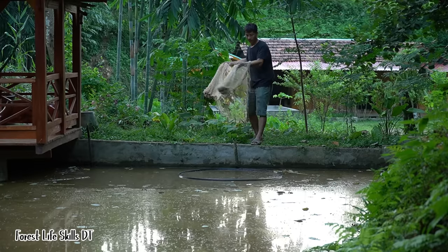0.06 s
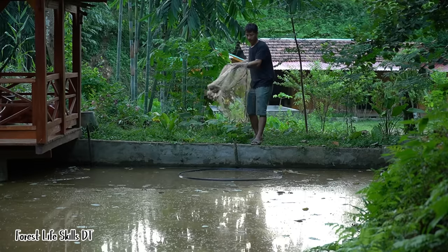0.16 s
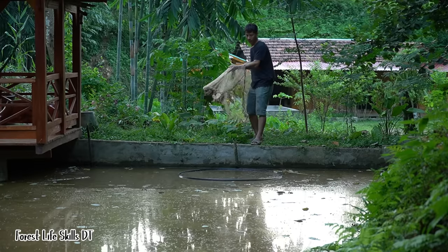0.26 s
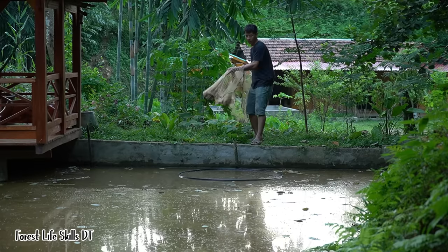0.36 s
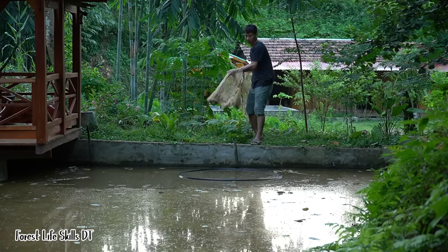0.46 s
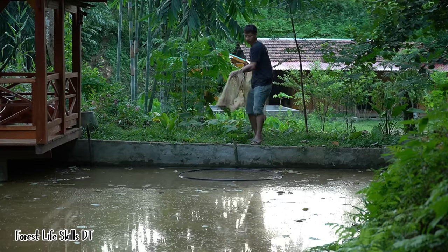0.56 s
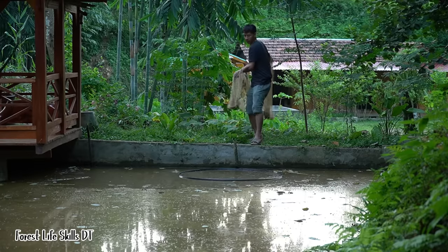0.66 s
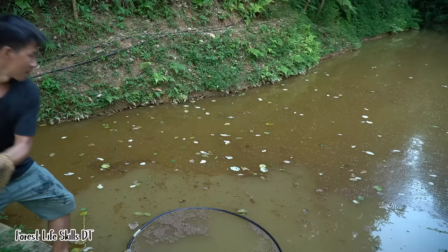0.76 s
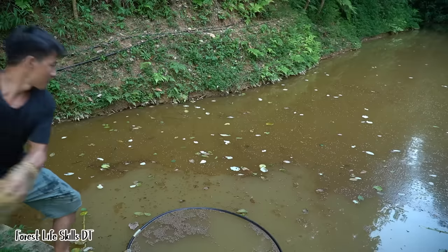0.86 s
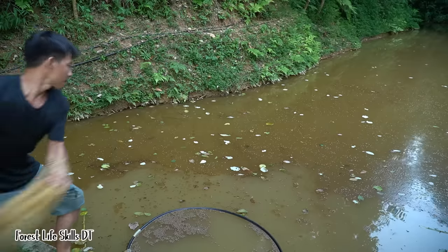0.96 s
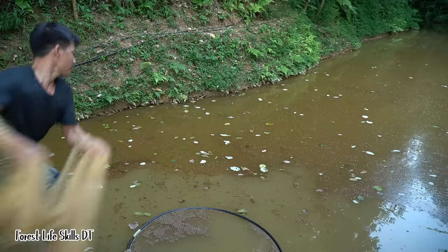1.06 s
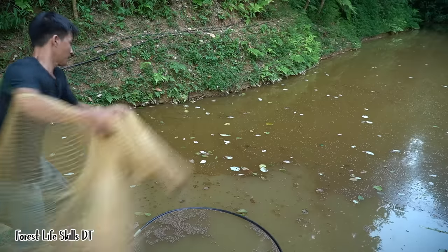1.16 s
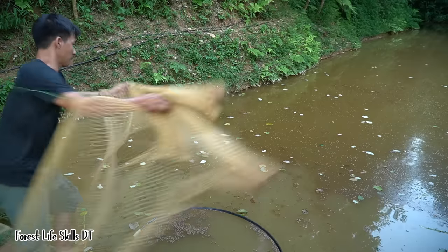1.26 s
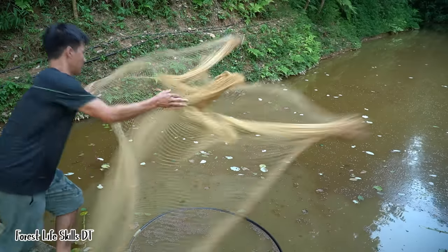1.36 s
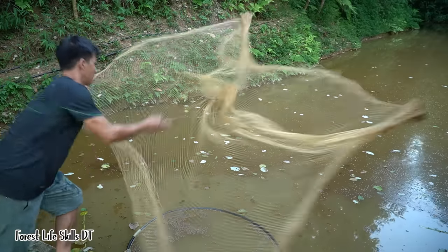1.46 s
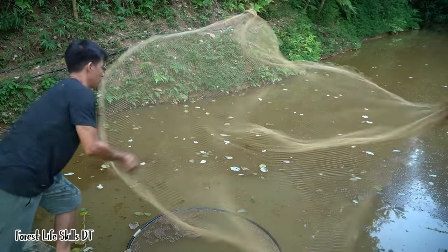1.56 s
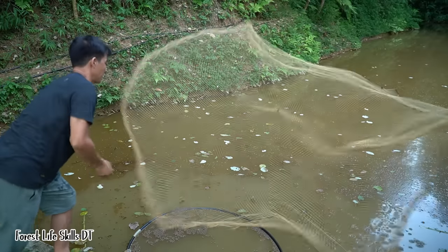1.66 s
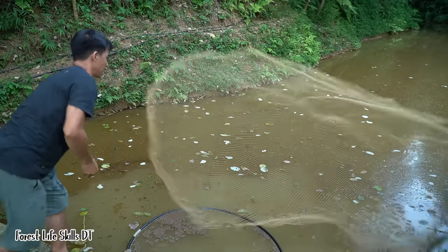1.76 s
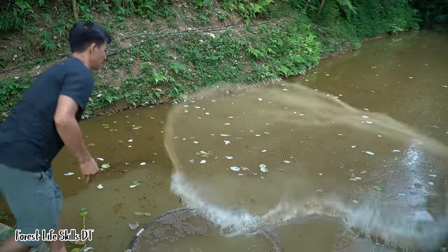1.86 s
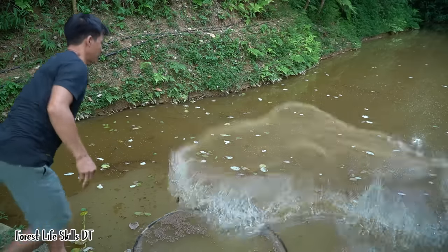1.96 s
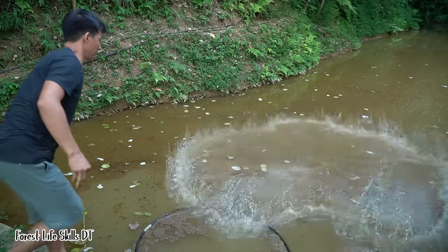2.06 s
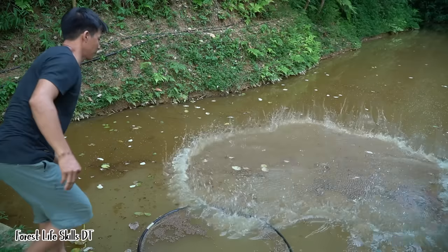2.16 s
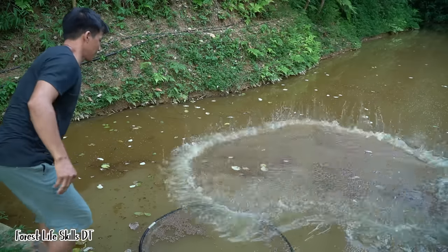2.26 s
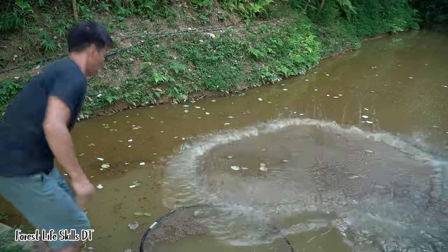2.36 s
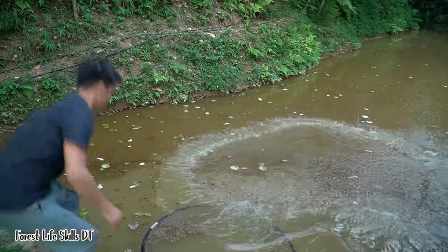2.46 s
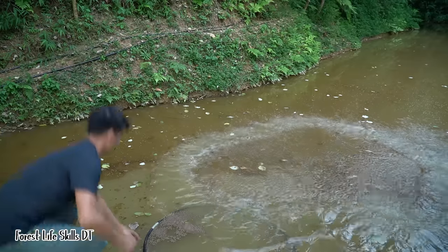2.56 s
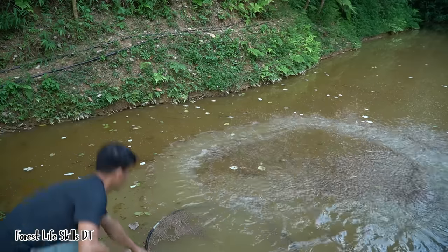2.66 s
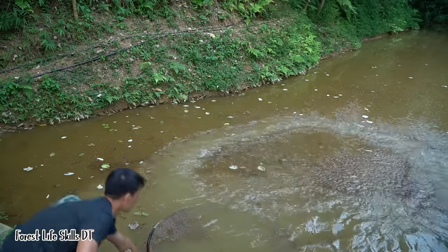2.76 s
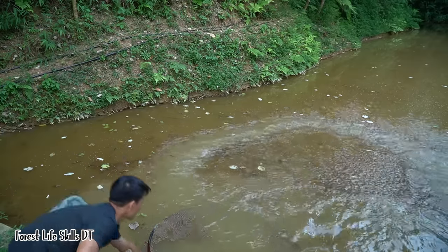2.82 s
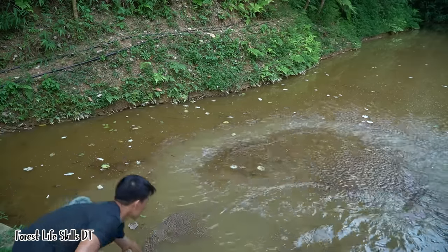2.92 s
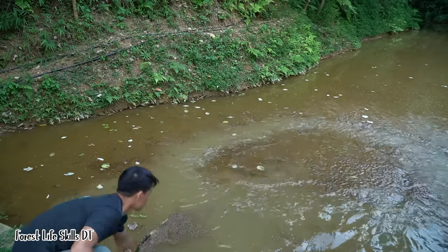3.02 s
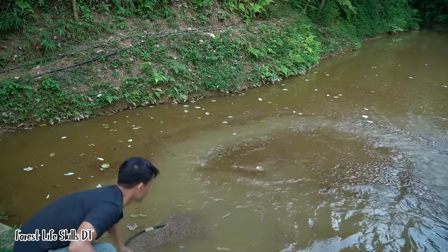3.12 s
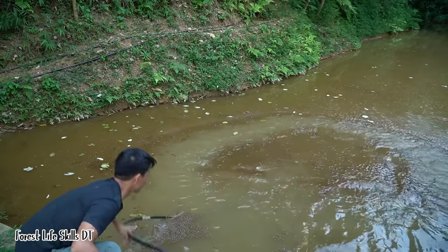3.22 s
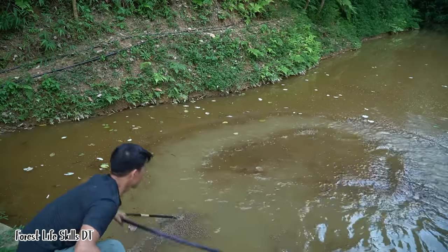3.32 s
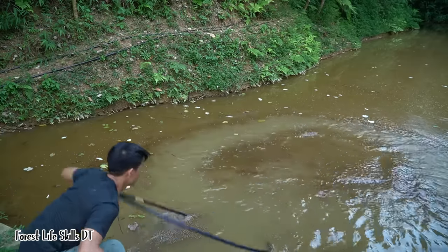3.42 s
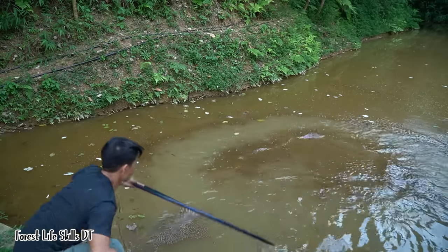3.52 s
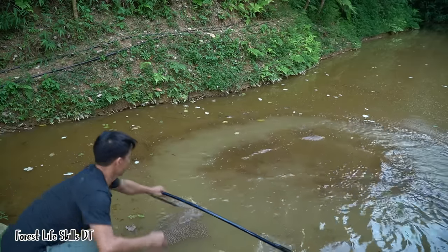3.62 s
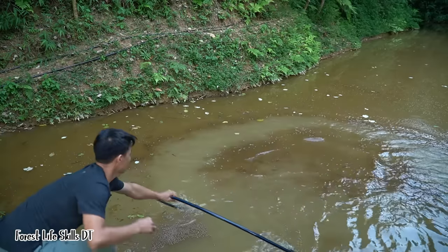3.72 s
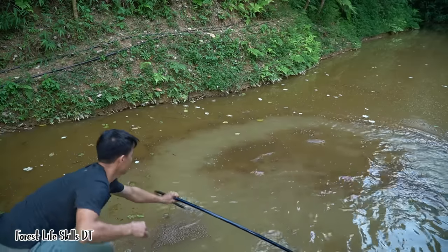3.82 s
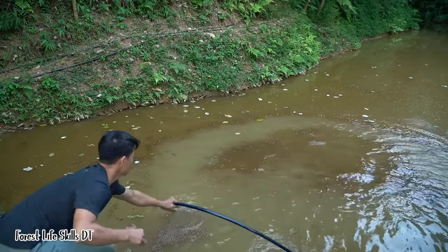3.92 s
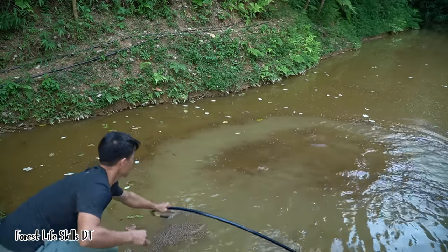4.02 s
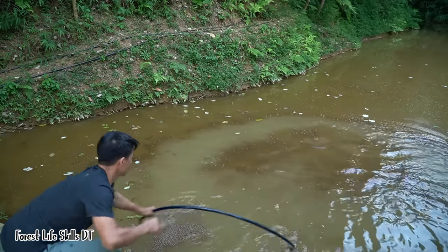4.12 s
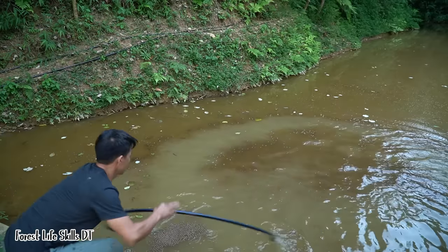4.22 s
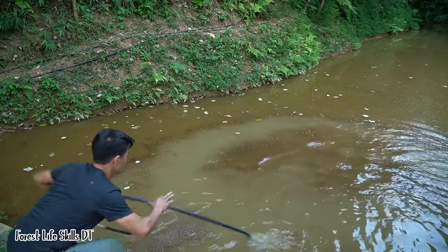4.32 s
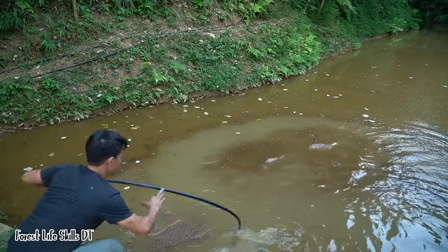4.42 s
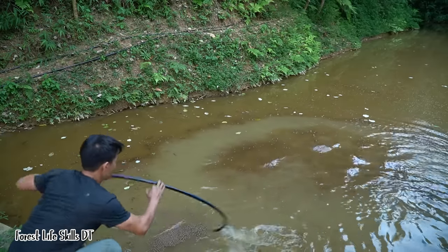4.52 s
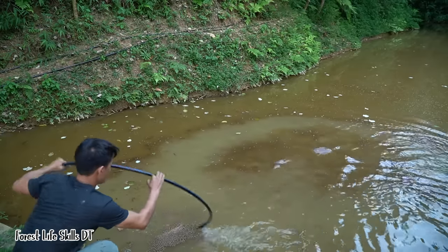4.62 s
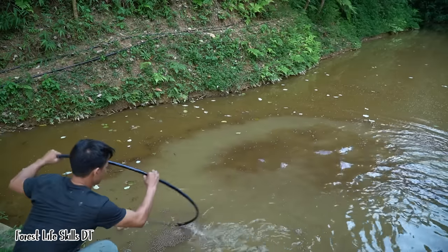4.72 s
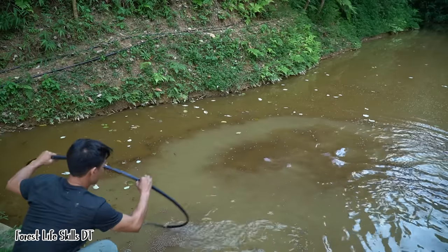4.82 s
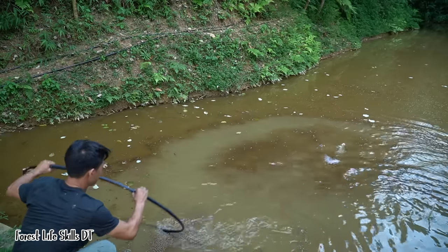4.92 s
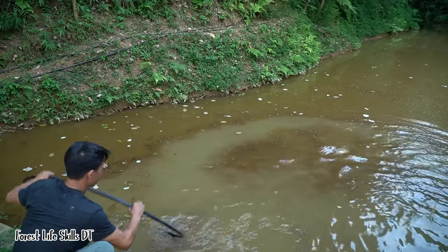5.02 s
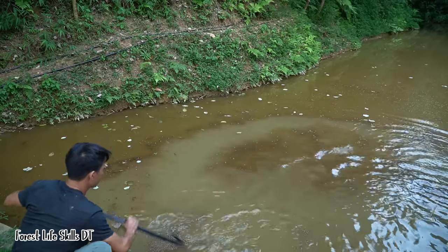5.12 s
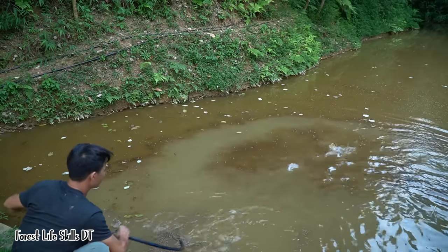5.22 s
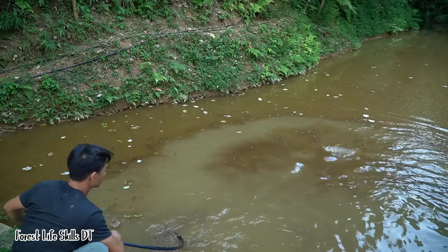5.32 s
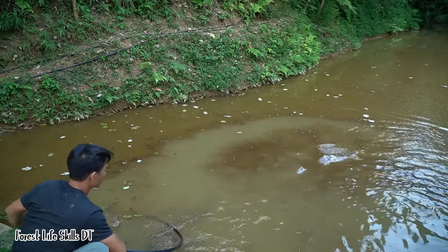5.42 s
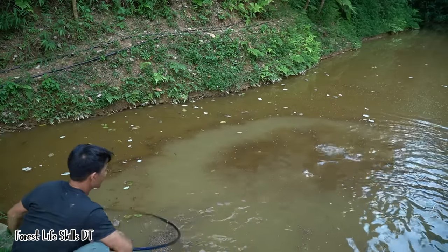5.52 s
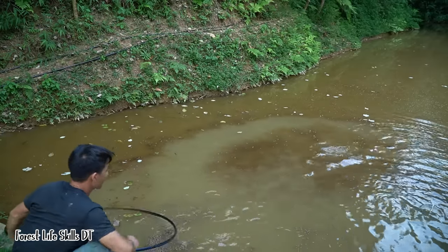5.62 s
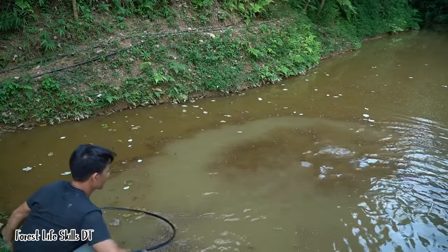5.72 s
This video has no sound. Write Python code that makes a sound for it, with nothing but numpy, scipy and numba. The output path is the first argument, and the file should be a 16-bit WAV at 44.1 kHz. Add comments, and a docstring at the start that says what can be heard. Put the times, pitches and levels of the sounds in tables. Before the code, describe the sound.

Steady high insect chirring in a quiet forest, with a faint plop. After an abrupt cut closer, a wet net swishes, a sole creaks briefly, and the net slaps down in a broad, pattering splash. It fades to drips, then a hose dragged through water makes bubbly gulps and small sloshes. Open air, stereo microphone near the thrower, slight scatter from the banks.

```python
"""Insects chirr over a quiet forest floor; a plop and a mud bubble sound from the pond, both as single sines.
At 0.79 s the scene cuts, with a 37 ms crossfade, from a view across the pond to one beside the thrower.
A wet cast net is swung, a sole creaks in stick-slip clicks, the net flies and slaps down over a low rumble.
A hose dragged through the water then sloshes. Water is clouds of ringing bubbles under a hiss of spray noise.
The banks scatter the pond's sounds, foliage the cricket's swept chirps; choirs and hush are shaped noise."""
import sys
import numpy as np
from scipy import signal
from scipy.fft import rfft, irfft
from scipy.io import wavfile
from numba import njit

SR = 44100
rng = np.random.default_rng(int(sys.argv[2]) if len(sys.argv) > 2 else 0)


def store_pcm(level_fs):
    """Save levels as 16-bit WAV."""
    pcm = np.round(np.clip(level_fs, -1, 1) * 32767).astype(np.int16)
    wavfile.write(sys.argv[1], SR, np.atleast_2d(pcm).T)


N = 254898

VIEW_CUT_S, CROSSFADE_S = .79, .037   # from across the pond to beside the thrower

# Forest hush. Each row: frequency in Hz, dB per Hz across the pond, dB per Hz at the thrower.
AIR = [(20, -77, -76), (50, -78.5, -83), (123, -81.5, -83), (228, -90, -88.5), (610, -91.5, -83.5),
       (1500, -94, -86), (3160, -97.5, -92), (5840, -101, -99), (8200, -101, -100), (10200, -105, -101),
       (12000, -109, -103), (16000, -112, -108)]
# How alike the hush is in both ears. Each row: frequency in Hz, left-right likeness (1 = the same).
AIR_LIKENESS = [(30, .995), (150, 0.97), (300, 0.62), (900, 0.47), (15000, 0.072)]
# Far insect choirs. Each row: pitch in Hz, width of each of two band-passes in Hz, level in dB across
# the pond, level in dB at the thrower, L-R in dB, throbs per second, throb depth in dB.
CHOIRS = [(3350, 460, -65.5, -61, 0, 11, -2.5), (4720, 510, -59.5, -59, 2, 4.6, 4.5),
          (6726, 105, -56, -63.5, 7, 83, 1.5), (7010, 510, -56, -59.5, -0.5, 45, -0.5),
          (8990, 370, -61, -62.5, 2, 48, 3)]
# Near cricket, bouts of even chirps. Each row: first start in seconds, bout end in seconds, chirp length
# in seconds, first and last level in dB before panning, pitch in Hz, pitch climb as a share, swell in dB.
CRICKET_BOUTS = [(-.066, .7, .14, -50, -52, 9250, .01, -3), (.792, 1.7, .085, -46, -50, 9030, .015, 1.5),
                 (3.9, 4.6, .1, -45, -43, 8750, .015, 7), (4.72, 5.8, .11, -33.5, -29.5, 8920, .022, 7)]
CHIRP_PERIOD_S, STROKES_PER_S, STROKE_S = .207, 76, .008
STROKE_SWEEP_HZ, STROKE_JITTER_DB = -650, 2.0
CRICKET_PAN_DB, CRICKET_LAG = 8, 2   # the cricket sits left: L-R dB, samples later on the right
LEAF_TAIL_S, LEAF_TAIL_DB = .3, -8   # foliage scatters each chirp into a haze

# Single bubbles and drips. Each row: start in seconds, level in dB before onset and panning, pitch in Hz.
PLOPS = [(0.589, -37.5, 2550), (2.958, -31.5, 724), (3.069, -31.5, 510), (3.3, -27, 970),
         (3.332, -23.5, 903), (3.376, -26, 990), (3.409, -26, 860), (3.43, -24.5, 850), (3.499, -30, 1005),
         (3.559, -33, 880), (3.613, -21.5, 570), (3.6635, -25, 810), (3.708, -16, 1290),
         (3.717, -13.5, 1577), (3.774, -24, 588), (3.775, -31, 354), (3.801, -15.5, 920),
         (3.819, -26.5, 935), (3.9062, -28, 3260), (3.981, -31.5, 2600), (4.056, -30, 2420),
         (4.077, -34.5, 1036), (4.208, -37.5, 284), (4.267, -36, 905), (4.283, -28, 890), (4.311, -20, 820),
         (4.331, -17, 634), (4.359, -20, 546), (4.389, -21, 800), (4.569, -23, 480), (4.57, -38, 266),
         (4.604, -24, 570), (4.632, -25, 777), (4.645, -25.5, 500), (4.729, -24.5, 622),
         (4.766, -24.5, 810), (4.853, -28, 2320), (5.1589, -20, 910), (5.12, -36, 404), (5.17, -22.5, 427),
         (5.245, -28.5, 960), (5.255, -37, 304), (5.303, -35.5, 392), (5.349, -33, 1100),
         (5.413, -32, 2760), (5.575, -38, 273), (5.664, -40, 271), (5.69, -35, 1300)]
# Small bubbles ring a few cycles longer.
PLOP_CYCLES, PLOP_CYCLES_AT_HZ, PLOP_CYCLES_POWER, PLOP_GLIDE = 33, 800, .15, .15
# A big bubble climbing out of the mud. Each row: start in seconds, level in dB before onset, pitch in Hz,
# cycles to -60 dB, glide (the pitch shifts by twice this share over the ring).
MUD_BUBBLE = [(0.624, -39, 306, 50.5, 2.2)]
# Rise time constants as a share of the ring
PLOP_ONSET, BUBBLE_ONSET, SLAP_ONSET = .025, .05, .016
PORT_LAG_S, LONE_LAG_SHARE = .000065, .15   # lag spread between the ports; lone drops fall nearly in front

# Bubble sizes, deepest first. Each row: pitch spread in octaves, cycles to -60 dB before breakup, glide,
# bubbles per second when quiet before breakup, size spread in dB, trim in dB.
HEAVE = (0.364, 26.3, 0.52, 74, 2.7, 2.1)
GULP = (0.4816, 40.8, 0.36, 200, 2, 1.58)
PATTER = (0.639, 24.6, 0.27, 1500, 1.16, 1.4)
SNAP = (0.6, 4, -1.6, 120, -23, -11)   # single droplets bursting out of the spray
HEAVE_HZ, PATTER_HZ, SNAP_HZ = 301, 2239, 10000
GULP_HZ, GULP_SINK_OCT_PER_DB = 754.4, .37   # the more the gulps lead the patter, the deeper they are
BUSIER_PER_DB, QUIET_DB = 1.33, -51   # louder water also makes more bubbles
# How the water breaks up: the flying mesh swishes drily, sloshes drip singly.
# Each row: time in seconds, crowding in dB, share of the ring length kept.
BREAKUP = [(.8, 11, .35), (1.75, 11, .35), (1.77, 1.5, .8), (2.6, 1.5, .8), (2.95, -8.5, .85),
           (5.78, -8.5, .85)]
LUMP_DB, LUMP_HZ = 1.7, 14   # water arrives in lumps: rms swell, fastest swell
WATER_LOW_HZ = 147

# The wet net wound up and flying. Each row: time in seconds, gulps, patter and spray in dB before lumps
# and trims, L-R in dB.
SWING = [(.8, -64, -64, -68, 6), (.92, -64.5, -67, -72, 8), (1.0, -54, -64.5, -74, 17),
         (1.055, -63, -59.5, -63, 12), (1.13, -47, -44.5, -59, 9), (1.17, -52.5, -53, -64, 15),
         (1.199, -53.5, -54.5, -57, 10), (1.225, -53, -42, -49, 11), (1.251, -50.5, -40, -48, 2.5),
         (1.31, -49.5, -44, -46, 4), (1.35, -50.5, -51.5, -48.5, 1), (1.42, -50.5, -49.5, -45.5, 0.5),
         (1.55, -53.5, -52, -51.5, -3), (1.6, -51.5, -46.5, -48, -2), (1.756, -52, -58, -59.5, -2)]
# The net landing, first sinker to last ripple. Each row: time in seconds, gulps, patter and spray in dB
# before lumps and trims.
LANDING = [(1.76, -48.5, -27.5, -41), (1.802, -39.5, -45.5, -56), (1.846, -47.5, -28, -33),
           (1.877, -27.5, -26.5, -29.5), (1.98, -19.5, -21, -33), (2.036, -26, -26, -29),
           (2.166, -20.5, -22, -35.5), (2.235, -28.5, -25.5, -34.5), (2.333, -32, -31, -37),
           (2.43, -27, -27, -36.5), (2.708, -41, -40.5, -47), (2.899, -53.5, -51.5, -52),
           (3.3, -89, -69, -95)]
# Sloshes of the hose. Each row: peak in seconds, hold in seconds, rise in dB per second, fall in dB per
# second, gulp pitch in Hz, heave, gulps, patter and spray in dB before lumps and trims.
SLOSHES = [(3.021, 0.059, 100, 88, 803, -55, -46, -43, -54),
           (3.375, 0.068, 39.5, 80, 990, -72, -47, -43.5, -54.5),
           (3.692, 0.03, 161, 254, 1010, -54, -37, -39, -49),
           (3.796, 0.028, 200, 252.5, 890, -62, -47.5, -55.5, -61),
           (4.063, .01, 198, 104, 1050, -72, -57, -65, -69),
           (4.331, .17, 125.5, 95, 689, -49, -37, -39, -54),
           (4.521, 0.0078, 148, 150, 733, -49, -36, -46, -48.5),
           (4.636, 0.011, 98, 71, 693, -66, -40, -38, -49.5),
           (4.78, .02, 62, 53, 806, -67, -49, -49.5, -57.5),
           (5.159, 0.028, 255, 116, 698, -42, -36.5, -40, -54),
           (5.284, 0.0091, 100, 154, 890, -60, -49, -64, -79),
           (5.412, .01, 84, 152, 784, -74, -58.5, -49.5, -61)]
# Trickle under the sloshes. One row: heave, gulps, patter and spray in dB before lumps and trims.
TRICKLE_DB = (-74, -63, -59, -64.5)
SWING_HEAVE_DB, LANDING_HEAVE_DB = -5, -12.5   # heave against the gulps
LANDING_PAN_DB, SLOSH_PAN_DB = -4.5, -2.5   # L-R

# Colour of the spray. Each row: frequency in Hz, relative level in dB per Hz.
SPRAY_COLOUR = [(2500, -19), (4000, -1.5), (6500, -2), (10000, -3), (16000, -5.5)]
# How alike the spray is in both ears. Each row: frequency in Hz, left-right likeness.
SPRAY_LIKENESS = [(3000, 0.37), (15000, 0.038)]
SPRAY_LEFT_DB, SPRAY_TRIM_DB = 3.5, 7.5   # further left than the patter; level trim
SPRAY_GRAIN_DB, SPRAY_GRAIN_HZ, GRAIN_PER_CROWD_DB = 1, 298, .22
# One low thump. Each row: time in seconds, level in dB.
THUMP = [(2.46, -80), (2.49, -42), (2.54, -70), (2.6, -93)]
# Low rumble swelling with the gulps: level at the loudest gulps, share of their swing, top of the band
RUMBLE_DB, RUMBLE_FOLLOWS, RUMBLE_HZ = -61, .61, 113

# A wet sole creaks as the thrower turns. Each row: time in seconds, slip level in dB.
CREAK = [(1.063, -12), (1.072, -0.5), (1.125, -5.5), (1.15, -22)]
# How the sole rings. Each row: pitch in Hz, width of each of two band-passes in Hz, level in dB.
CREAK_MODES = [(593, 240, 4.5), (1327, 340, 11.5), (1584, 260, 11), (2200, 220, -1), (8000, 9400, -20)]
CREAK_SLIPS_PER_S, CREAK_JITTER, CREAK_SLIPS = 200, .25, 24
# Single drops spitting dry and bright. Each row: start in seconds, level in dB before onset.
SPITS = [(1.3758, -33), (1.5883, -32), (3.6406, -37), (3.7194, -36), (4.2911, -43), (4.4044, -36),
         (4.4894, -41), (4.5176, -35), (4.5794, -34), (4.6334, -27), (5.3926, -43)]
SPIT_HZ, SPIT_CYCLES, SPIT_GLIDE = 13500, 24, -.22
# Sinkers and drops ticking. Each row: start in seconds, level in dB before onset and panning, pitch in Hz.
TICKS = [(1.378, -24, 6200), (1.5124, -25, 5920), (1.523, -21, 6540), (1.556, -31, 5560),
         (1.5715, -24, 9300), (1.5883, -17.5, 8230), (1.6184, -19.5, 8560), (1.762, -18, 4570),
         (3.382, -14, 5960), (3.64, -30, 4440), (3.72, -28, 4000), (4.386, -23, 5270), (4.4094, -18, 7600),
         (4.7257, -25, 4790), (5.387, -35, 8980)]
TICK_CYCLES = 22
# Flat slaps on the surface. Each row: start in seconds, level in dB before onset and panning, pitch in Hz,
# cycles to -60 dB (a negative count stays silent), bright edge against the slap in dB.
SLAPS = [(1.531, -28, 3600, 45, -20), (1.7612, -20, 2500, -2, -6), (1.8425, -3.5, 1200, 5.5, -12),
         (1.8672, -1, 2130, 6, -8), (3.015, -21, 1080, 9, -17), (3.6917, -12, 950, 15.5, -2.5),
         (3.7207, -11.5, 1440, 13, -3), (4.213, -28.5, 1760, 32, 2), (4.227, -31, 1620, 16, -12),
         (4.483, -20, 4270, 44, -15), (4.511, -12, 880, 8.5, 0.5), (4.555, -15.5, 1910, 8, -12),
         (4.617, -22, 3130, 39, -17), (4.634, -14.5, 2130, 6, -3), (4.988, -28.5, 2900, 20, -5),
         (5.082, -29, 1300, 5, 9), (5.15, -24, 1500, 4, 0), (5.191, -19.5, 600, 12, -10),
         (5.573, -18.5, 1090, 5.5, -25), (5.662, -22, 1060, 5.5, -25)]
SLAP_GLIDE, EDGE_RATIO = -.34, 2.43   # the cavity opens, so the pitch sinks; edge pitch against slap pitch

BANK_TAIL_S, BANK_DB, BANK_HZ = .21, -9.5, 3670   # scatter off the pond's banks
CUTOFF_HZ = 16200


def from_db(db):
    """Decibels to gain."""
    return 10 ** (np.asarray(db) / 20)


def rms_one(x):
    """Scale to unit rms."""
    return x / np.sqrt(np.mean(x ** 2) + 1e-20)


def sides(pan_db):
    """Left and right gains of an L-R level difference."""
    return from_db(np.multiply.outer([.5, -.5], pan_db))


def filtered(x, order, hz, kind="low", rate=SR):
    """Butterworth filter."""
    return signal.sosfilt(signal.butter(order, hz, kind, fs=rate, output="sos"), x)


def resonance(x, hz, width_hz):
    """Two-pole band-pass, gain near 1 on top."""
    r = np.exp(-np.pi * width_hz / SR)
    feedback = [1, -2 * r * np.cos(2 * np.pi * hz / SR), r * r]
    return signal.lfilter([(1 - r * r) / 2, 0, (r * r - 1) / 2], feedback, x)


def coloured(hz, db, alike):
    """Stereo noise of a given spectrum (dB per Hz) and left-right likeness."""
    log_hz = np.log(np.maximum(np.fft.rfftfreq(N, 1 / SR), 1))
    gain = from_db(np.interp(log_hz, np.log(hz), db)) * np.sqrt(SR / 4)
    mid, side = rfft(rng.standard_normal((2, N))) * gain
    alike_hz, share = np.transpose(alike)
    alike = np.clip(np.interp(log_hz, np.log(alike_hz), share), -1, 1)
    return irfft(np.sqrt(1 + alike) * mid + np.sqrt(1 - alike) * side * [[1], [-1]], N)


def scatter(x, t60, db):
    """A mono sound smeared into a stereo haze by many small reflectors."""
    tail = rng.standard_normal((2, 16000)) * from_db(-60 * np.arange(16000) / SR / t60)
    tail *= from_db(db) / np.sqrt(np.sum(tail ** 2) / 2)
    return signal.fftconvolve(x[None], tail, axes=1)[:, :N]


@njit
def add(out, s, hz, cycles, glide, onset, left, right, lag):
    """Each bubble is a dying sine; a positive glide climbs, as when it nears the surface."""
    for k in range(len(s)):
        life = cycles[k] / hz[k] * SR   # samples to -60 dB
        first, skew = int(s[k] * SR), np.pi * hz[k] * lag[k]
        fade, swell, dying, filling = np.exp(-6.9 / life), np.exp(-1 / (onset * life)), 1., 1.
        for i in range(min(int(.7 * life), out.shape[1] - first)):
            phase = 2 * np.pi * hz[k] * i / SR * (1 + glide[k] * i / life)
            out[0, first + i] += left[k] * dying * (1 - filling) * np.sin(phase + skew)
            out[1, first + i] += right[k] * dying * (1 - filling) * np.sin(phase - skew)
            dying, filling = dying * fade, filling * swell


def bubbles(s, peak, hz, cycles, glide, pan_db, onset, lag_share=LONE_LAG_SHARE):
    """Stereo sum of single bubbles, each with its own arrival lag between the ports."""
    out, one = np.zeros((2, N)), np.ones(len(s))
    lag = lag_share * PORT_LAG_S * rng.standard_normal(len(s))
    left, right = peak * sides(pan_db * one)
    add(out, s, np.clip(hz * one, 80, 17000), cycles * one, glide * one, onset, left, right, lag)
    return out


def air(near):
    """Forest hush as noise, most alike in both ports in the bass."""
    hz, far_db, near_db = np.transpose(AIR)
    far_hush = coloured(hz, far_db, AIR_LIKENESS)
    near_hush = coloured(hz, near_db, AIR_LIKENESS)
    return (1 - near) * far_hush + near * near_hush


def choirs(near):
    """Many far callers blur into throbbing bands of noise."""
    out, t = 0, np.arange(N) / SR
    for hz, width, far_db, near_db, pan, per_s, throb_db in CHOIRS:
        noise = rng.standard_normal((2, N))
        band = rms_one(resonance(resonance(noise, hz, width), hz, width))
        wander = np.cumsum(rng.standard_normal(N)) * .62 * np.sqrt(per_s / SR)   # uneven throbbing
        throb = throb_db * np.sin(2 * np.pi * per_s * t + wander)
        out = out + band * from_db(far_db + (near_db - far_db) * near + throb) * sides([pan])
    return out


def cricket():
    """Each chirp is a row of swept wing strokes that change in level and climb a little in pitch."""
    out, t = np.zeros(N), np.arange(N) / SR
    for first, end, length, first_db, last_db, hz, climb, swell_db in CRICKET_BOUTS:
        for start in np.arange(first, end, CHIRP_PERIOD_S):
            at = (t >= start) & (t < start + length)
            age = t[at] - start
            db = np.interp(start, [first, end], [first_db, last_db])
            through = np.clip((age % (1 / STROKES_PER_S)) / STROKE_S, 0, 1)   # share of the stroke
            pitch = hz * (1 + climb * (age / length - .7)) + STROKE_SWEEP_HZ * (through - .5)
            uneven_db = STROKE_JITTER_DB * rng.standard_normal(32)[(age * STROKES_PER_S).astype(int)]
            level = from_db(db + uneven_db + swell_db * (age / length - 1))
            stroke = np.sin(np.pi * through) ** 2
            out[at] += level * stroke * np.sin(2 * np.pi * np.cumsum(pitch) / SR)
    direct = [out, np.roll(out, CRICKET_LAG)] * sides([CRICKET_PAN_DB])
    return direct + scatter(out, LEAF_TAIL_S, LEAF_TAIL_DB)


def plops(at, pan):
    """Lone bubbles and drips ring as dying sines that climb a little."""
    s, db, hz = np.transpose(PLOPS)
    cycles = PLOP_CYCLES * (hz / PLOP_CYCLES_AT_HZ) ** PLOP_CYCLES_POWER
    return bubbles(s, from_db(db), hz, cycles, PLOP_GLIDE, .22 * np.interp(s, at, pan), PLOP_ONSET)


def mud_bubble():
    """A big bubble climbs out of the mud, its pitch rising far."""
    s, db, hz, cycles, glide = np.transpose(MUD_BUBBLE)
    return bubbles(s, from_db(db), hz, cycles, glide, 0, BUBBLE_ONSET)


def lumps():
    """Slow random swell of the water in dB, one value a millisecond."""
    noise = rng.standard_normal(N * 1000 // SR + 2)
    return LUMP_DB * rms_one(filtered(noise, 2, LUMP_HZ, rate=1000))


def churn(at):
    """Swing, landing, trickle and sloshes add in power: four levels in dB, gulp pitch and direction."""
    stirs = []   # (levels in dB, gulp pitch, L-R dB)
    for rows, heave_db, pan_db in (SWING, SWING_HEAVE_DB, None), (LANDING, LANDING_HEAVE_DB, LANDING_PAN_DB):
        s, *columns = np.transpose(rows)
        gulp, patter, hiss = (np.interp(at, s, c, left=-120, right=-120) for c in columns[:3])
        hz = GULP_HZ * 2 ** (-GULP_SINK_OCT_PER_DB * (gulp - patter))
        pan = pan_db or np.interp(at, s, columns[-1])
        stirs.append(([gulp + heave_db, gulp, patter, hiss], hz, pan))
    landed = at > LANDING[0][0]
    stirs.append((np.where(landed, np.c_[list(TRICKLE_DB)], -120), GULP_HZ, 0))
    for peak, hold, rise, fall, hz, *db in SLOSHES:
        before, after = np.maximum(peak - at, 0), np.maximum(at - peak - hold, 0)
        stirs.append((np.c_[db] - rise * before - fall * after, hz, SLOSH_PAN_DB))
    power = sum(from_db(db) ** 2 for db, *_ in stirs)
    # The gulps weigh the pitch, the patter weighs the direction.
    hz = sum(from_db(db[1]) ** 2 * hz for db, hz, _ in stirs) / power[1]
    pan = sum(from_db(db[2]) ** 2 * pan_db for db, _, pan_db in stirs) / power[2]
    return *(10 * np.log10(power)), hz, pan


def cloud(kind, rows_s, level_db, centre_hz, pan_db, count):
    """Random bubbles of one size class; their number and size follow the level."""
    octaves, cycles, glide, quiet_per_s, spread_db, trim_db = kind
    s = rng.uniform(VIEW_CUT_S, N / SR, count)
    luck, tone, size = rng.random(count), rng.standard_normal(count), rng.exponential(1, count)
    db = np.interp(s, rows_s, level_db)
    most = count / (N / SR - VIEW_CUT_S)   # bubbles per second if all are born
    when, crowd_db, ring = np.transpose(BREAKUP)
    cycles = cycles * np.interp(s, when, ring)
    busier_db = BUSIER_PER_DB * (db - QUIET_DB) + np.interp(s, when, crowd_db)
    per_s = np.minimum(quiet_per_s * from_db(busier_db), most)
    born = luck < per_s / most
    hz = np.interp(s, rows_s, centre_hz) * 2 ** (octaves * tone)
    energy = cycles / hz / (8 * np.log(1000))   # of a unit ring, in s
    sizes = rms_one(from_db(spread_db * np.minimum(size, 4)))
    peak = sizes * from_db(db + trim_db) / np.sqrt(per_s * energy)
    pan = np.interp(s, rows_s, pan_db)
    return bubbles(s, peak * born, hz, cycles * born + 1e-3, glide, pan, BUBBLE_ONSET, .86)


def spray(rows_s, level_db, pan_db):
    """Countless droplets merge into a hiss with a fine grain."""
    t = np.arange(N) / SR
    hiss = rms_one(coloured(*np.transpose(SPRAY_COLOUR), SPRAY_LIKENESS))
    grain = rms_one(filtered(rng.standard_normal(N), 2, SPRAY_GRAIN_HZ))
    when, crowd_db, _ = np.transpose(BREAKUP)
    grain_db = SPRAY_GRAIN_DB - GRAIN_PER_CROWD_DB * np.interp(t, when, crowd_db)   # sparse drops: grainier
    level = np.interp(t, rows_s, level_db) + SPRAY_TRIM_DB + grain_db * grain
    return hiss * from_db(level) * sides(np.interp(t, rows_s, pan_db) + SPRAY_LEFT_DB)


def rumble(at, gulp_db):
    """Low rumble of band-passed noise, swelling with the gulps, with one thump."""
    t = np.arange(N) / SR
    below_loudest = np.interp(t, at, gulp_db) - gulp_db.max()
    swell = from_db(RUMBLE_DB + RUMBLE_FOLLOWS * below_loudest)
    thump = from_db(np.interp(t, *np.transpose(THUMP), -120, -120))
    return (swell + thump) * rms_one(filtered(rng.standard_normal(N), 2, [25, RUMBLE_HZ], "band"))


def creak():
    """Uneven stick-slip clicks ring the rubber sole."""
    gaps = (1 + CREAK_JITTER * rng.uniform(-1.3, 1, CREAK_SLIPS)) / CREAK_SLIPS_PER_S
    at = CREAK[0][0] + np.cumsum(gaps) - gaps[0]
    slip_db = np.interp(at, *np.transpose(CREAK), right=-120) + rng.normal(0, .97, CREAK_SLIPS)
    slips = np.zeros(N) + 1e-18
    slips[(at * SR).astype(int)] = from_db(slip_db)
    rung = 0
    for hz, width, db in CREAK_MODES:
        rung = rung + from_db(db) * resonance(resonance(slips, hz, width), hz, width)
    return rung * sides([1.5])


def spits():
    """Single drops spit as short, very high, sinking rings."""
    s, db = np.transpose(SPITS)
    return bubbles(s, from_db(db), SPIT_HZ, SPIT_CYCLES, SPIT_GLIDE, 0, SLAP_ONSET)


def ticks(at, pan):
    """Sinkers and drops tick as short rings of steady pitch."""
    s, db, hz = np.transpose(TICKS)
    return bubbles(s, from_db(db), hz, TICK_CYCLES, 0, np.interp(s, at, pan), SLAP_ONSET)


def slaps(at, pan):
    """Each flat slap is a ring sinking as its cavity opens, with a brighter edge above its pitch."""
    out = 0
    s, db, hz, cycles, edge_db = np.transpose(SLAPS)
    slap_pan = .23 * np.interp(s, at, pan)
    for ratio, more_db in (1, 0), (EDGE_RATIO, edge_db):
        out = out + bubbles(s, -from_db(db + more_db), ratio * hz, cycles, SLAP_GLIDE, slap_pan, SLAP_ONSET)
    return out


def water():
    """Clouds of heave, gulps, patter and snaps, the single drops and slaps, spray and rumble."""
    lump_db = lumps()
    at = np.arange(len(lump_db)) / 1000
    heave_db, gulp_db, patter_db, spray_db, gulp_hz, pan = churn(at)
    # Gulps and patter swell together, the spray half as much.
    gulp_db, patter_db = gulp_db + lump_db, patter_db + lump_db
    spray_db = np.where(at < VIEW_CUT_S, -120, spray_db + .5 * lump_db)
    out = plops(at, pan) + mud_bubble()
    out += cloud(HEAVE, at, heave_db, HEAVE_HZ + 0 * at, 0 * pan, count=1500)
    out += cloud(GULP, at, gulp_db, gulp_hz, .1 * pan, count=6000)
    out += cloud(PATTER, at, patter_db, PATTER_HZ + 0 * at, pan, count=40000)
    out += cloud(SNAP, at, spray_db, SNAP_HZ + 0 * at, pan, count=4000)
    out += spits() + ticks(at, pan) + slaps(at, pan)
    out = filtered(out, 4, WATER_LOW_HZ, "high")   # bubbles radiate no deep bass
    return out + spray(at, spray_db, pan) + rumble(at, gulp_db)


def banks(x):
    """Dull scatter off the pond's banks; the bass passes them by."""
    dull = filtered(x.mean(axis=0), 2, [600, BANK_HZ], "band")
    return scatter(dull, BANK_TAIL_S, BANK_DB)


def scene():
    """Everything at the microphone; the cut between the views crossfades the hush and the choirs."""
    near = np.clip((np.arange(N) / SR - VIEW_CUT_S) / CROSSFADE_S, 0, 1)
    pond = water() + creak()
    return air(near) + choirs(near) + cricket() + pond + banks(pond)


def record(dry):
    """The top is cut steeply, by 70 dB from the cutoff up."""
    return signal.sosfilt(signal.cheby2(16, 70, CUTOFF_HZ, fs=SR, output="sos"), dry)


dry = scene()
out = record(dry)
store_pcm(out)
```